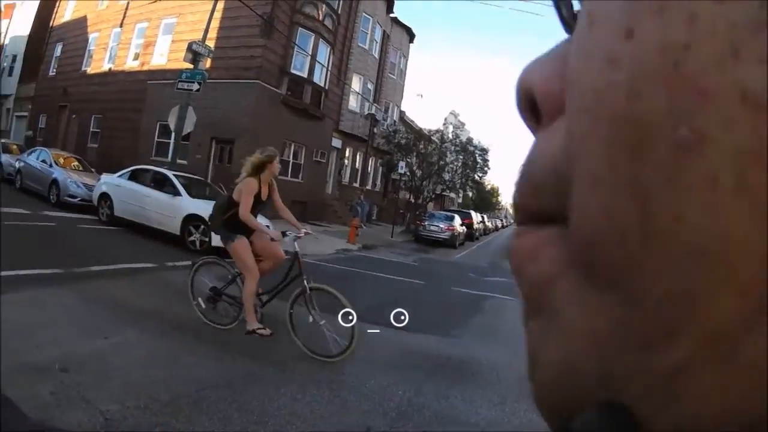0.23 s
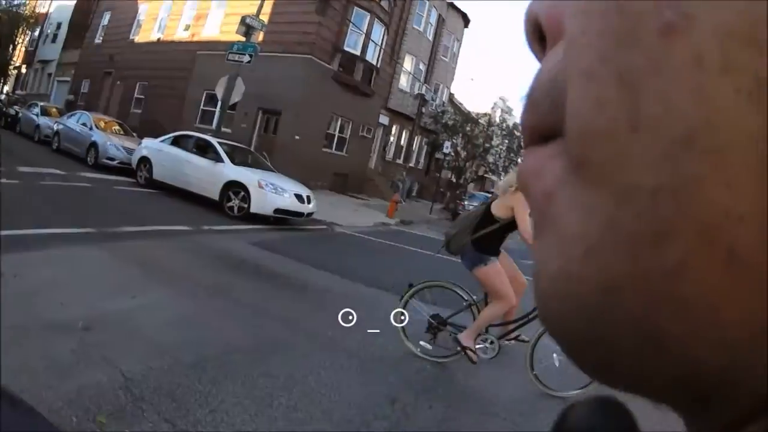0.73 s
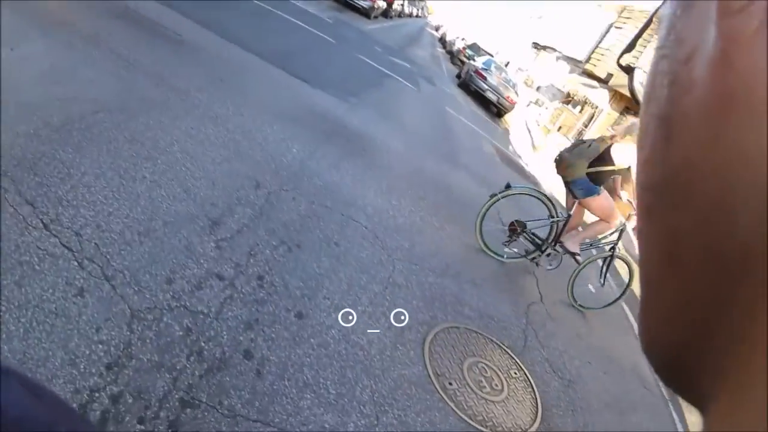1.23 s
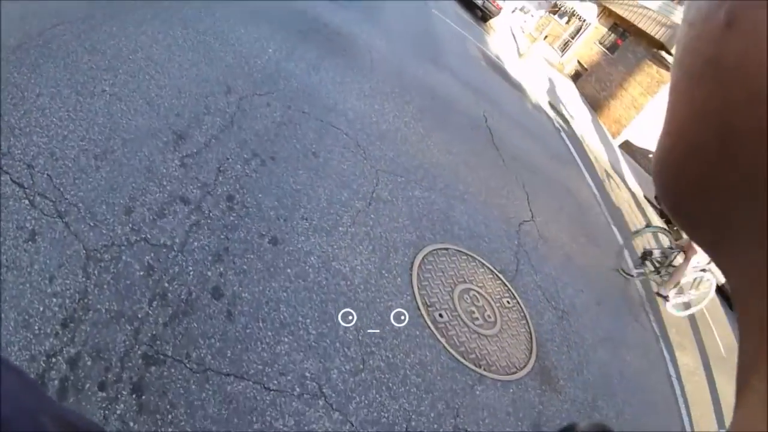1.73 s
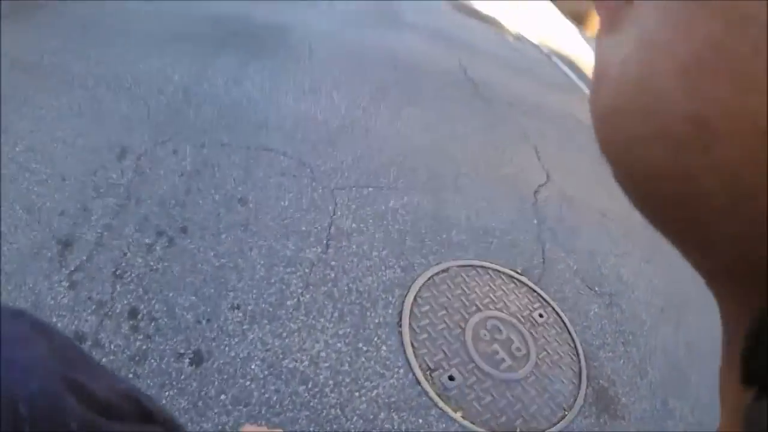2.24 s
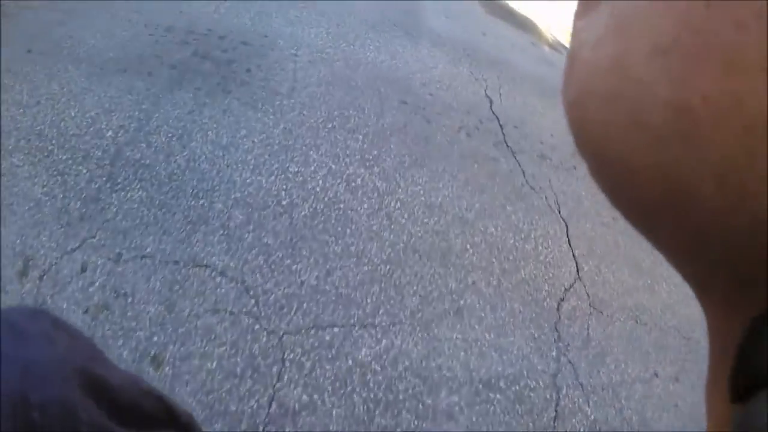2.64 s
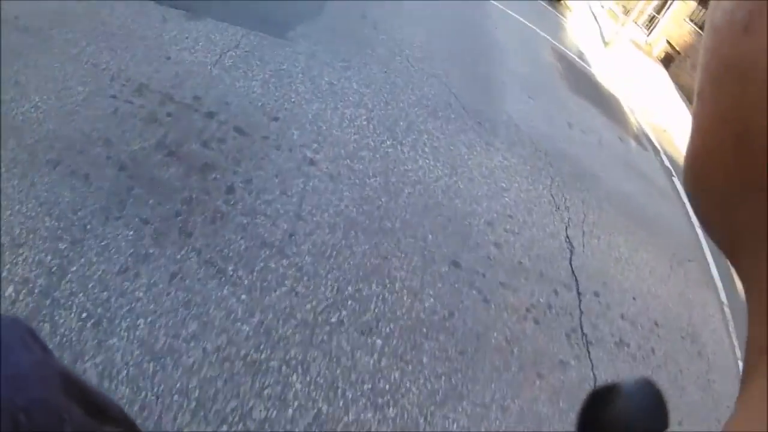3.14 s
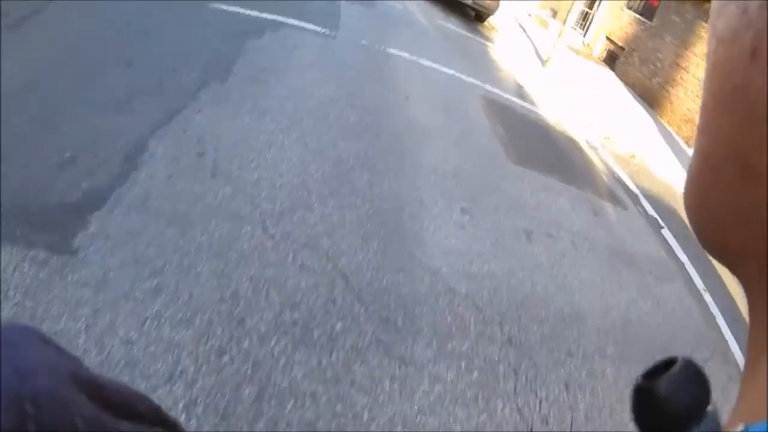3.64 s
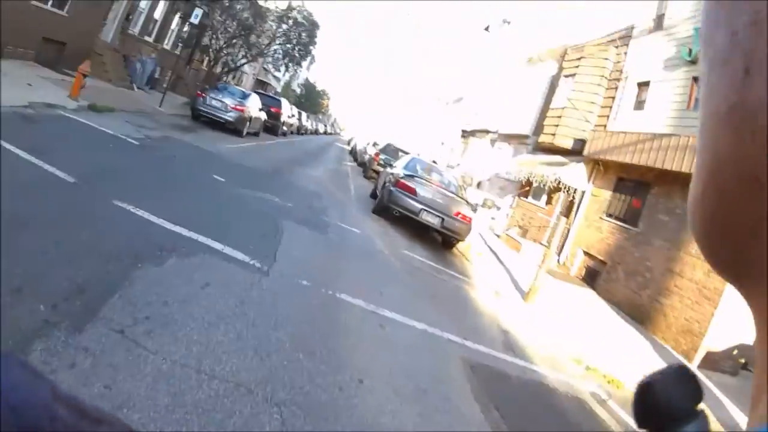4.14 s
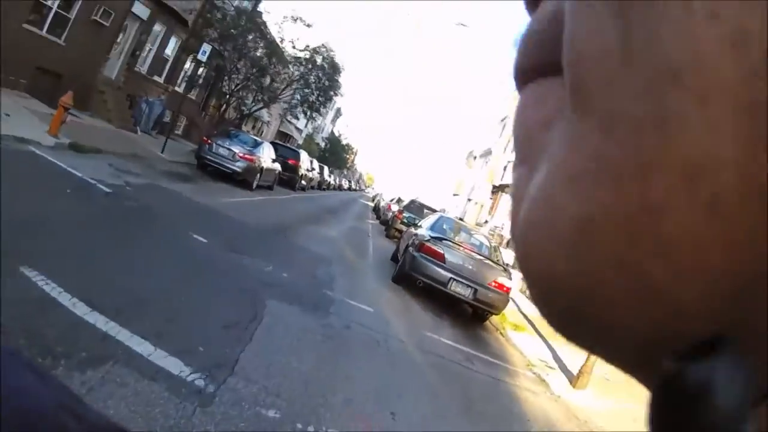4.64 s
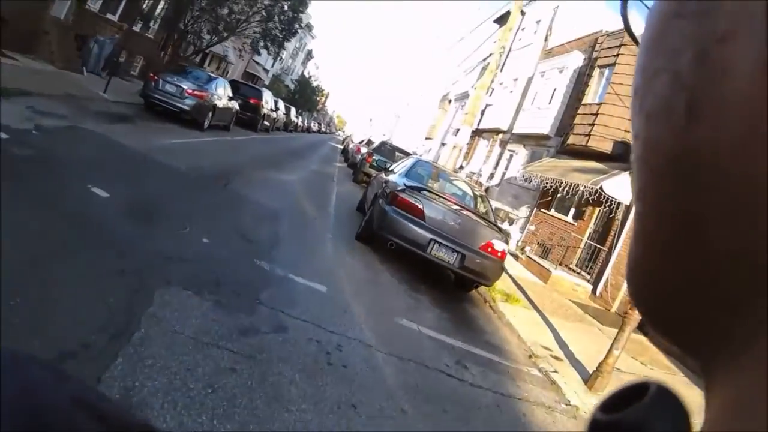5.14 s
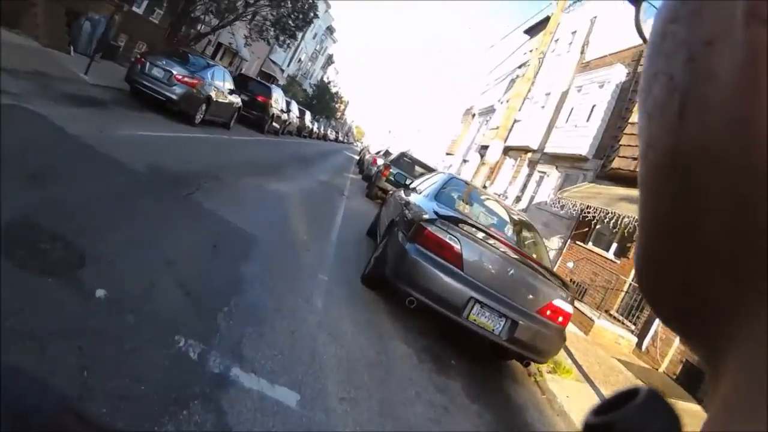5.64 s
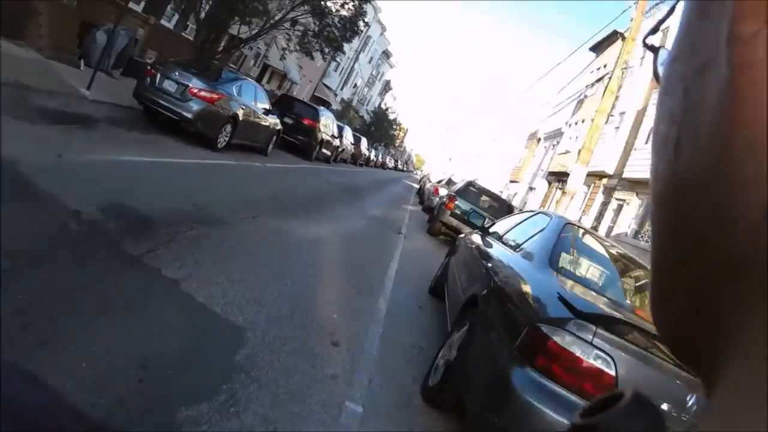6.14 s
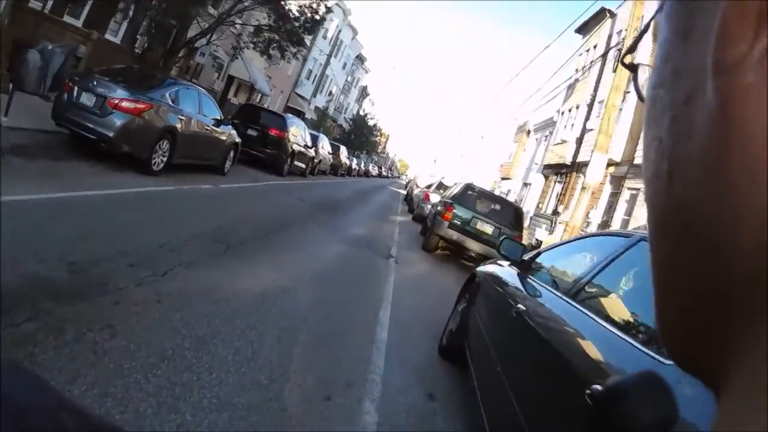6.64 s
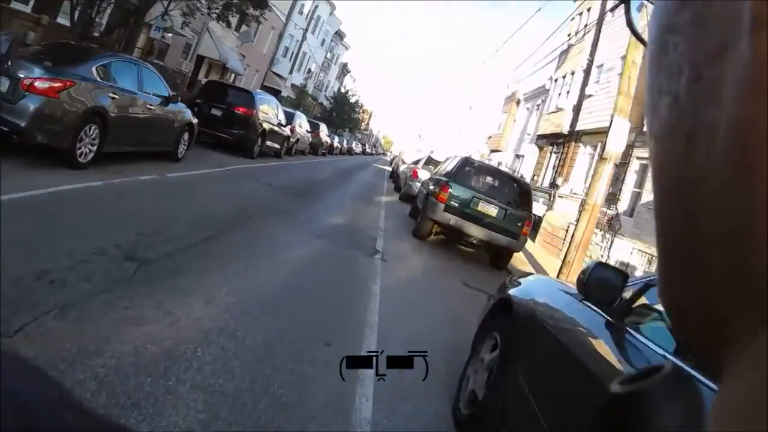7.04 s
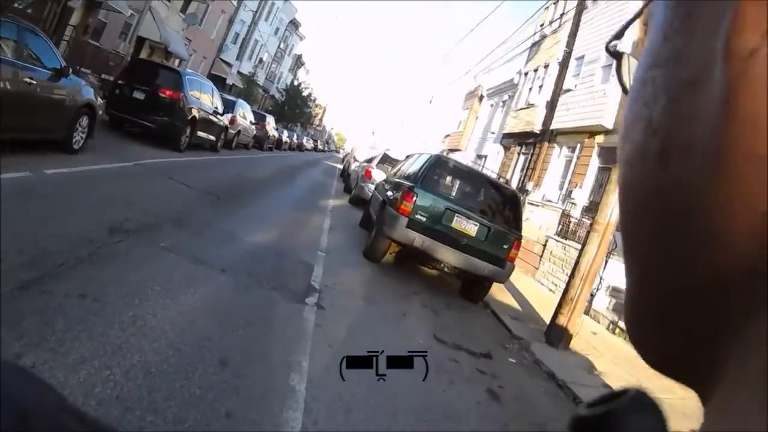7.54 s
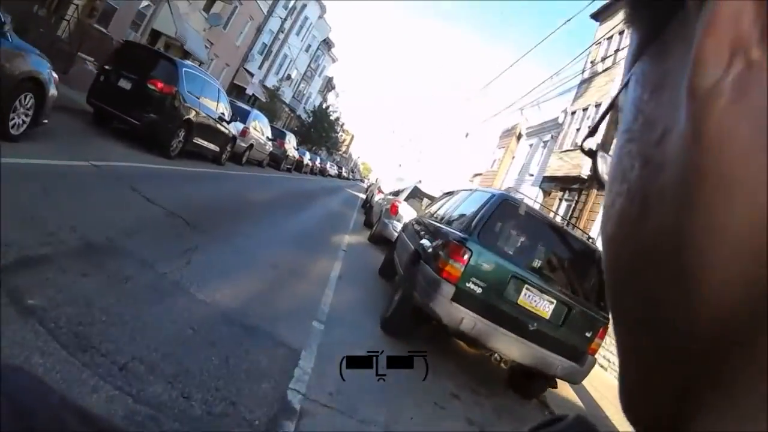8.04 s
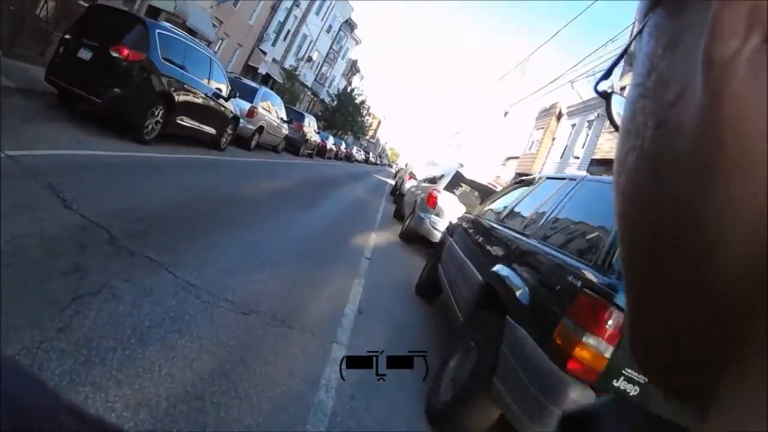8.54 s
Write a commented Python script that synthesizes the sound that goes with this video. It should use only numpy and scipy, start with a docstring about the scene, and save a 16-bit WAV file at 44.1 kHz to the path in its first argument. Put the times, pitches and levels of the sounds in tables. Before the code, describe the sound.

For the first two seconds there is low, soft city traffic and faint air, with short raspy sparrow chirps at 0 to 0.7 and again near 1.5, lightly echoed by houses. Knocks and ticks on the bicycle come at 1.4, 1.6 and 1.8, with a tiny squeak at 1.9 and a dull thud at 2.2. At about 2.26 a small two-stroke engine catches abruptly, close to the microphone, puttering slowly with crackle, hiss and loose metal rattles. Around 3.3 it surges and pulls away, smoother and boomier, its buzz rising unevenly towards 5.9. From 5.9 to 6.7 it misfires in uneven, hollow low thumps, with blunt wind puffs. It then recovers into a steady, fast, raspy drone with thin metallic ringing, shifting slightly in colour beside parked cars and climbing in pitch to the end at 8.8.

```python
"""Motorized bicycle pulling away

Traffic hums and sparrows chirp; something on the bike knocks before its two-stroke engine catches.
It putters at idle, then speeds up: every firing rings pipe models and sets off bursts and rings of metal and gas.
It misfires for a moment with dull thumps; wandering delays then echo it off parked cars.
Coloured noise makes the traffic and the wind, which grows with engine speed.
"""
import sys
import numpy as np
from scipy import signal
from scipy.fft import rfft, irfft, next_fast_len
from scipy.io import wavfile
from scipy.ndimage import uniform_filter1d, map_coordinates

SR = 44100
rng = np.random.default_rng(int(sys.argv[2]) if len(sys.argv) > 2 else 0)


def waveform_to_disk(signal):
    """Save audio, clipped to [-1, 1], as 16-bit WAV at the path in sys.argv[1]."""
    frames = np.transpose(np.atleast_2d(signal))
    scaled = np.clip(frames, -1, 1) * 32767
    samples = np.round(scaled).astype(np.int16)
    wavfile.write(sys.argv[1], SR, samples)


N = 387638

# street traffic spectrum: freq_hz, relative_db
STREET_SPECTRUM = [(25, -11.5), (60, -7.5), (130, -3), (230, -1), (400, -5), (700, -8), (1100, -12),
                   (1700, -20), (3000, -32), (5000, -39), (7500, -48.5)]
# steady wind spectrum: freq_hz, relative_db
BUFFET_SPECTRUM = [(20, -30), (60, -11), (130, -19.5), (220, -16.5), (320, -15), (500, -6.5), (1200, -21.5),
                   (4000, -64.5)]
# gust spectrum: freq_hz, relative_db
GUST_SPECTRUM = [(20, -24), (60, -8), (120, -3), (190, -2), (300, -14), (600, -25), (1200, -40),
                 (4000, -75)]
# gusts on the microphone: centre_s, half_length_s, level_db
GUSTS = [(5.2, 0.36, -29), (5.948, 0.026, -16), (6.3, 0.38, -34), (6.74, 0.037, -16.5), (7.05, 0.068, -24),
         (7.47, 0.056, -27.5)]
WIND_STILL_DB, WIND_RIDING_DB = -46.5, -39.5  # at idle, under load

# sparrow notes: start_s, length_s, start_hz, middle_hz, end_hz, level_db
CHIRPS = [(-.01, 0.056, 4300, 3840, 2840, -42), (0.224, 0.038, 4060, 3920, 3870, -47),
          (0.28, 0.057, 3280, 3170, 3170, -45), (0.555, 0.017, 5300, 4500, 4000, -51),
          (0.61, 0.058, 4350, 5000, 5400, -44), (0.652, 0.049, 4300, 3990, 4720, -44),
          (0.697, 0.031, 3300, 3670, 4650, -39.5), (1.436, 0.039, 5100, 4980, 4600, -48),
          (1.46, 0.041, 4120, 3780, 3380, -45), (1.526, 0.032, 3400, 2960, 2700, -43)]

# blows and ticks on the bike: start_s, relative_db, brightness (0-1), decay_s
KNOCKS = [(1.417, -27.5, 0.58, 0.017), (1.612, -35.5, 0.8, 0.014), (1.826, -39, 1, 0.005),
          (2.176, -30, 0.9, 0.0046), (2.201, -19.5, 0.07, 0.027)]
# dull part of a blow: freq_hz, relative_db
THUD_SPECTRUM = [(30, -34), (120, -5.5), (230, -1), (450, -16), (800, -21), (1500, -50), (8000, -65)]
# bright part of a blow: freq_hz, relative_db
CLACK_SPECTRUM = [(30, -27), (150, 3), (500, -5), (800, -4), (1100, 2), (1400, -4), (1800, -11),
                  (3000, -17), (8000, -38)]
# loose metal rattles: centre_s, half_length_s, level_db
RATTLES = [(2.294, 0.0016, -22.5), (2.414, 0.0018, -23), (2.476, 0.0025, -25), (2.882, 0.0037, -27.5),
           (2.9, 0.016, -28), (3.33, 0.05, -54)]
# frame hum at the firing rate: time_s, level_db
SHAKE_LEVEL = [(5.3, -65), (5.8, -42), (6.1, -56), (7.3, -50), (7.9, -42), (8.7, -40.5)]

FIRST_FIRING_S = 2.2621
# engine speed: time_s, firing_rate_hz
SPEED = [(2.26, 34.9), (2.56, 28.63), (2.94, 30.23), (3.13, 33.99), (3.35, 44.81), (3.6, 40.2),
         (3.89, 40.49), (3.98, 44.83), (4.18, 47.71), (4.43, 41.74), (4.65, 44.34), (5.36, 49.13),
         (5.9, 59.21), (6.05, 55.08), (6.3, 56.37), (6.6, 53.51), (7.13, 56.44), (7.45, 55.62),
         (7.81, 58.7), (8.54, 58.71), (8.79, 63.12)]
IDLE_HZ, BITE_HZ, LOADED_HZ = 35.2, 37, 46  # firing rates: idle, drive bites, full load
WAVER_S, WAVER_RATE_HZ = 0.00011, 14  # crank drift ahead and behind
ROUGH_IDLE, ROUGH_LOADED, ROUGH_SKIPPING = 0.3, 0.2, 0.17  # roughness; the last is added while skipping
# engine skips at part throttle: from_s, to_s, ramp_s
SKIPPING = (5.92, 6.7, 0.18)
# drive takes up its slack, metal quietens: from_s, to_s, ramp_s
PULL_AWAY = (3.29, 4.92, 0.46)

# exhaust pipe, throttle closed: freq_hz, relative_db
PIPE_IDLE = [(30, -32.5), (130, 0), (205, -2.5), (290, 6), (440, -7), (520, -7.5), (680, -5), (930, -8),
             (1130, -19), (1240, -30), (1430, -11), (1620, -25.5), (1850, -53), (8000, -82)]
# exhaust pipe, throttle open: freq_hz, relative_db
PIPE_LOAD = [(30, -33.5), (115, 0.5), (180, 7), (250, -5.5), (340, 7.5), (420, -11), (510, -2), (660, -4),
             (810, 2.5), (960, -7), (1090, -8.5), (1270, -18), (1470, -21.5), (1750, -30), (8000, -100)]
# pipe resonances raised by hotter gas: time_s, pitch_scale
PIPE_HEAT = [(2.3, 0.89), (2.7, 0.86), (3.35, 0.95), (3.8, 0.99), (5.1, 0.93), (5.9, 0.95), (7.3, 0.95),
             (8.0, 1)]
# how hard the engine fires: time_s, pop_db, boom_db
EFFORT = [(2.26, -14.5, -16.5), (2.6, -17.5, -17), (3.1, -16.5, -18.5), (3.32, -10.5, -16), (3.6, -18, -21),
          (4.15, -17, -23), (4.45, -21.5, -23), (4.66, -16, -18), (5.25, -16, -17), (5.42, -14, -16),
          (5.5, -16, -19), (5.78, -15.5, -18), (6.05, -19, -25), (6.3, -17, -22.5), (6.64, -20.5, -21.5),
          (6.75, -16.5, -17.5), (6.92, -17.5, -21), (7.85, -17.5, -19), (8.42, -16, -17.5), (8.6, -19, -19)]
# gas puff of a full firing, shorter is brighter: time_s, width_s
PUFF = [(3.1, 0.00016), (3.35, 0.00025), (3.7, 0.00029), (4.15, 0.00036), (4.6, 0.00023), (5.4, 0.0003),
        (5.8, 0.00026), (6.6, .00019), (6.85, 0.00014), (7.4, .00017), (7.6, 0.000078), (7.8, 0.00024),
        (7.95, 0.00018), (8.1, 0.00027), (8.7, 0.00023)]
# loaded boom follows the crank: reference firing rate, exponent, lowest pitch scale
BOOM_HZ, BOOM_FOLLOWS, BOOM_LOWEST = 57.4, 0.97, 0.865
# silencer chambers, throttle closed: centre_hz, width_hz
CHAMBERS_IDLE = [(174, 84), (1035, 215)]
# silencer chambers, throttle open: centre_hz, width_hz
CHAMBERS_LOAD = [(990, 370)]
# low midrange of the pops, before trim: time_s, relative_db
MIDRANGE_LEVEL = [(2.32, -26), (2.97, -25.5), (3.36, -20.5), (3.65, -29), (4.19, -20.5), (4.33, -27.5),
                  (5.63, -23), (5.84, -27.5), (6.53, -26.5), (6.8, -19), (6.87, -29), (7.11, -29.5),
                  (7.2, -18.5), (7.36, -27.5), (7.5, -22.5), (7.74, -26), (7.84, -17), (7.9, -30),
                  (7.93, -20), (8.02, -19.5), (8.11, -32), (8.17, -24.5), (8.47, -28), (8.51, -42),
                  (8.53, -26.5), (8.78, -25)]
MIDRANGE_HZ, MIDRANGE_WIDTH_HZ, MIDRANGE_TRIM_DB = 486, 182, 0.5

# weak firings and their thumps in the silencer: start_s, thump_db
MISFIRES = [(5.968, -12), (6.006, -11), (6.043, -15), (6.096, -9), (6.13, -8), (6.166, -10), (6.187, -17),
            (6.223, -9), (6.256, -8.5), (6.291, -8), (6.329, -15), (6.363, -8), (6.401, -11.5),
            (6.438, -22), (6.491, -16), (6.548, -16), (6.618, -13)]
SKIP_LOSS, SKIP_WIDENS = 0.38, 0.15  # shares: strength lost, puff width gained
THUMP_HZ, THUMP_RISE_S = 235, 0.0046

# engine case: centre_hz, width_hz, relative_db
CASE_MODES = [(1450, 170, 18.5), (1995, 310, 7), (2570, 260, -18)]
CLATTER_DB, CLATTER_IDLE_DB, CLATTER_PULL_DB = -22.5, -3, -27  # re pops; added at idle; while pulling away
# escaping gas: freq_hz, relative_db
HISS_SPECTRUM = [(500, -19.5), (1500, 20.5), (3200, 11), (4500, 8), (7400, 0), (9000, -88.5)]
HISS_DB, HISS_IDLE_DB, HISS_PULL_DB = -31, 6.5, -5.5  # likewise
RASP_BETWEEN, RASP_BETWEEN_IDLE = 0.47, -0.091  # share of rasp between firings; change at idle
# air box, applied twice: centre_hz, width_hz, relative_db
AIRBOX_MODES = [(425, 354, 0)]
INTAKE_DB, INTAKE_IDLE_DB = -18, 9  # re pops; added at idle
# exhaust port cracking open: freq_hz, relative_db
SNAP_SPECTRUM = [(800, -41.5), (2200, -12), (3500, -5), (5500, -1), (7400, 1), (9000, -61.5)]
SNAP_DB, SNAP_PULL_DB = -37.5, 0.5  # re pops; added while pulling away
# crackling spray: freq_hz, relative_db
SPRAY_SPECTRUM = [(600, -32.5), (1500, -2), (2300, 1.5), (3200, -4), (4200, -14.5), (7500, -20.5),
                  (9000, -60.5)]
# crackling spray: time_s, level_db
SPRAY_LEVEL = [(2.26, -47), (2.31, -45), (2.5, -36), (2.75, -46), (2.9, -40.5), (3.05, -44), (3.22, -42),
               (3.36, -34.5), (3.46, -51), (3.7, -72)]
# cooling fins: time_s, pitch_hz
FINS_PITCH = [(4.4, 2745), (5.5, 2734), (6.7, 2750), (7.1, 2800), (8.7, 2780)]
# cooling fins: time_s, level_db
FINS_LEVEL = [(3.65, -56), (3.8, -52), (4.2, -54), (4.5, -45.5), (4.7, -51), (4.95, -50), (5.1, -45.5),
              (5.5, -48), (5.9, -48), (6.05, -55), (6.25, -47.5), (6.62, -55.5), (6.73, -42.5), (6.87, -51),
              (7.1, -46), (7.65, -48.5), (8.2, -53), (8.4, -47), (8.78, -50.5)]
# engine head: time_s, pitch_hz
HEAD_PITCH = [(4.9, 2058), (5.8, 2131), (7.2, 2174), (8.7, 2152.5)]
# engine head: time_s, level_db
HEAD_LEVEL = [(3.6, -69.5), (4.5, -64), (5, -49), (5.4, -44), (5.9, -44), (6.05, -59), (6.3, -44),
              (6.7, -58), (7.15, -45.5), (7.5, -46.5), (7.8, -51), (8.7, -50.5)]
# cylinder rung by the piston: time_s, pitch_hz
CYLINDER_PITCH = [(2.3, 1276), (2.7, 1265), (3.6, 1330), (4.4, 1400), (5.402, 1398), (7.999, 1456)]
# cylinder, before trim: time_s, relative_db
CYLINDER_LEVEL = [(2.32, -28), (2.34, -26), (2.88, -23), (2.97, -27), (3.88, -30), (4.01, -42.5),
                  (4.71, -34.5), (4.73, -43), (5.32, -37.5), (6.1, -47), (6.83, -34), (7.39, -49),
                  (7.5, -33.5), (8.78, -36)]
FINS_RING_S, HEAD_RING_S, SLAP_RING_S, SLAP_TRIM_DB = 0.004, 0.0012, 0.0019, -2.5

# echoes off parked cars: from_s, to_s, ramp_s
PARKED_CARS = (6.2, 9.5, .5)
ECHO_PATHS_M, ECHO_WANDER_M, ECHO_RATE_HZ, ECHO_DB = (1.5, 2.4), .3, 4, -14  # extra path, its wander
SOUND_M_PER_S = 343
TOP_HZ = 7900


def amp(db):
    """Decibels to gain."""
    return 10 ** (np.asarray(db) / 20)


def unit(x):
    """Scale to rms 1."""
    return x / np.sqrt(np.mean(x ** 2) + 1e-20)


def along(points, hz):
    """Interpolate (freq_hz, value) points on a log axis."""
    f, v = np.transpose(points)
    return np.interp(np.log(hz + 1), np.log(f + 1), v)


def curves(rows):
    """One value per sample for each column after the time."""
    s, *cols = np.transpose(rows)
    return [np.interp(np.arange(N) / SR, s, c) for c in cols]


def wobble(rate_hz):
    """Smooth random curve with rate_hz knots a second."""
    knots = rng.standard_normal(int(N * rate_hz / SR) + 4)
    return map_coordinates(knots, [np.arange(N) * rate_hz / SR])


def spell(start_s, end_s, ramp_s):
    """Rise from 0 to 1, hold and fall back."""
    t = np.arange(N) / SR
    return np.clip(np.minimum(t - start_s, end_s - t) / ramp_s, 0, 1)


def swells(rows):
    """Summed gain of bell-shaped swells: centre_s, half_length_s, level_db."""
    t = np.arange(N) / SR
    return sum(amp(db) * np.exp(-((t - s) / length) ** 2) for s, length, db in rows)


def filtered(x, response):
    """Multiply the spectrum of x by a response of frequency."""
    m = next_fast_len(N + SR // 2)
    return irfft(rfft(x, m) * response(np.fft.rfftfreq(m, 1 / SR)), m)[:N]


def coloured(x, spectrum):
    """Filter x by a spectrum table."""
    return filtered(x, lambda hz: amp(along(spectrum, hz)))


def noise(spectrum):
    """Coloured noise of rms 1."""
    return unit(coloured(rng.standard_normal(N), spectrum))


def resonate(x, modes):
    """Pass x through parallel band-pass resonances."""
    def response(f):
        return sum(amp(db) * 1j * f * w / (c * c - f * f + 1j * f * w) for c, w, db in modes)
    return filtered(x, response)


def impulse(spectrum, size=4096):
    """Minimum-phase ring of a body with this spectrum."""
    cepstrum = irfft(np.log(amp(along(spectrum, np.fft.rfftfreq(size, 1 / SR)))))
    # fold onto positive time to make the ring causal
    cepstrum[1:size // 2] *= 2
    cepstrum[size // 2 + 1:] = 0
    return irfft(np.exp(rfft(cepstrum)))[:size // 2]


def levelled(x, at):
    """Bring a pulse train to rms 1, averaged over five cycles."""
    power = np.add.reduceat(x ** 2, at) / np.diff(np.append(at, N))
    smooth = uniform_filter1d(power[:-1], size=5)
    return x / np.sqrt(np.interp(np.arange(N), at[:-1], smooth) + 1e-20)


def speeding(from_hz, to_hz):
    """0 to 1 as the firing rate climbs through a range."""
    return np.clip((curves(SPEED)[0] - from_hz) / (to_hz - from_hz), 0, 1)


def air(traffic_db=-34.0, lumps_db=-2.0):
    """Steady traffic noise, lumpy wind that grows with engine speed, and gusts."""
    traffic = amp(traffic_db) * noise(STREET_SPECTRUM)
    riding = speeding(IDLE_HZ, LOADED_HZ)
    breeze = amp(WIND_STILL_DB + (WIND_RIDING_DB - WIND_STILL_DB) * riding)
    lumps = unit(amp(lumps_db * wobble(22)) * noise(BUFFET_SPECTRUM))
    return traffic + breeze * lumps + swells(GUSTS) * noise(GUST_SPECTRUM)


def sparrows(rasp=0.057, echo_db=-2, t60_s=0.37):
    """Short glides with a raspy pitch, echoed by the house fronts as a decaying noise tail."""
    song, waver = np.zeros(N), 1 + rasp * wobble(600)
    for s, length, start_hz, middle_hz, end_hz, db in CHIRPS:
        i = np.arange(max(int(s * SR), 0), int((s + length) * SR))
        u = np.clip((i / SR - s) / length, 0, 1)
        pitch_hz = np.interp(u, [0, .5, 1], [start_hz, middle_hz, end_hz]) * waver[i]
        envelope = np.sqrt(np.abs(np.sin(np.pi * u)))
        song[i] += amp(db) * envelope * np.sin(2 * np.pi * np.cumsum(pitch_hz) / SR)
    t = np.arange(SR // 2) / SR
    tail = rng.standard_normal(len(t)) * np.exp(-np.log(1000) * t / t60_s)
    return song + amp(echo_db) * signal.fftconvolve(song, tail / np.linalg.norm(tail))[:N]


def squeak(pitch_hz=4000, waver=.003):
    """Faint thin sine squeak just before the engine catches."""
    phase = 2 * np.pi * np.cumsum(pitch_hz * (1 + waver * wobble(60))) / SR
    return swells([(1.91, 0.083, -59)]) * np.sin(phase)


def knocks(rise_s=0.0015, trim_db=7.5):
    """Decaying dull and bright noise: blows and small ticks on the bike before the engine catches."""
    thud, clack, out = noise(THUD_SPECTRUM), noise(CLACK_SPECTRUM), np.zeros(N)
    for s, db, bright, decay_s in KNOCKS:
        t = np.maximum(np.arange(N) / SR - s, 0)
        envelope = (1 - np.exp(-t / rise_s)) * np.exp(-t / decay_s)
        out += amp(db + trim_db) * envelope * ((1 - bright) * thud + bright * clack)
    return out


def rattles(chatter=0.15):
    """Short chattering noise bursts coloured by the engine case."""
    grains = rng.standard_normal(N) * np.exp(chatter * wobble(700))
    return swells(RATTLES) * unit(resonate(grains, CASE_MODES))


def shake():
    """Unbalanced crank hums the frame: a sine at the firing rate."""
    turns = np.cumsum(curves(SPEED)[0] * (np.arange(N) / SR > FIRST_FIRING_S)) / SR
    return amp(curves(SHAKE_LEVEL)[0]) * np.sqrt(2) * np.sin(2 * np.pi * turns)


def firings(rough, jitter_s=0.00044):
    """Sample of each firing: one per crank turn, jittered in proportion to roughness."""
    start = int(FIRST_FIRING_S * SR)
    turns = np.cumsum(curves(SPEED)[0][start:]) / SR
    at = start + np.searchsorted(turns, np.arange(int(turns[-1]) + 1))
    jitter = jitter_s * rough[at] * rng.standard_normal(len(at))
    late_s = jitter + WAVER_S * wobble(WAVER_RATE_HZ)[at]
    return np.clip(at + (SR * late_s).astype(int), 0, N - 1)


def taps(at, scatter_db):
    """One single-sample blow of random strength at each firing."""
    kicks = np.zeros(N)
    kicks[at] = amp(scatter_db * rng.standard_normal(len(at)))
    return kicks


def bursts(at, delay_s, decay_s, between, scatter_db):
    """Noise that flares after each firing and sinks to a steady share between them."""
    t = np.arange(SR // 20) / SR - delay_s
    decay = (t > 0) * np.exp(-np.abs(t) / decay_s)
    flare = signal.fftconvolve(taps(at, scatter_db), decay)[:N]
    return (flare + between * (np.arange(N) >= at[0])) * rng.standard_normal(N)


def ringing(at, pitch, ring_s, detune, scatter_db):
    """A metal part swells and dies away after each firing, at a slightly random pitch."""
    t, hz, out = np.arange(SR // 30) / SR, curves(pitch)[0], np.zeros(N + SR)
    envelope = t * np.exp(-t / ring_s)
    for i, (off, size) in zip(at, rng.standard_normal((len(at), 2))):
        tone = np.sin(2 * np.pi * hz[i] * (1 + detune * off) * t)
        out[i:i + len(t)] += amp(scatter_db * size) * envelope * tone
    return levelled(out[:N], at)


def intake(at):
    """The piston sucks air through the air box well after each pop: delayed resonant bursts."""
    gulps = bursts(at, delay_s=0.013, decay_s=0.003, between=0.38, scatter_db=3.0)
    return levelled(resonate(resonate(gulps, AIRBOX_MODES), AIRBOX_MODES), at)


def snaps(at):
    """Short bright noise crack as the exhaust port opens."""
    crack = bursts(at, delay_s=.0006, decay_s=.0011, between=0, scatter_db=2.5)
    return levelled(coloured(crack, SNAP_SPECTRUM), at)


def spray(at, grain=0.45):
    """Unburnt mixture crackles behind the slow pops: grainy noise bursts."""
    grains = bursts(at, delay_s=.0008, decay_s=.003, between=.1, scatter_db=1.5)
    grains = grains * np.exp(grain * wobble(900))
    return amp(curves(SPRAY_LEVEL)[0]) * levelled(coloured(grains, SPRAY_SPECTRUM), at)


def clatter(at, between, idle):
    """Noise bursts ring the engine case, grainier at idle."""
    blows = bursts(at, delay_s=.001, decay_s=.003, between=between, scatter_db=1.8)
    return levelled(resonate(blows * np.exp(.5 * idle * wobble(500)), CASE_MODES), at)


def hiss(at, between):
    """Escaping gas: a bright noise burst after each firing."""
    jet = bursts(at, delay_s=.0008, decay_s=.0028, between=between, scatter_db=2.2)
    return levelled(coloured(jet, HISS_SPECTRUM), at)


def exhaust(at, load, scale, rough, width_s, split_hz=420, scatter_db=2):
    """Each firing rings the pipe: hot gas raises the pop, crank speed the loaded boom; turbulence varies each."""
    idle, loaded = impulse(PIPE_IDLE), impulse(PIPE_LOAD)
    n = np.arange(len(idle))
    crank = np.maximum((curves(SPEED)[0] / BOOM_HZ) ** BOOM_FOLLOWS, BOOM_LOWEST)
    trains = np.zeros((2, N + len(n)))  # pop, boom

    def stretched(ring, by):
        return np.interp(n * by, n, ring, right=0)

    def low(hz):
        return 1 / (1 + (hz / split_hz) ** 6)

    # a misfired charge burns weakly
    weak = np.zeros(len(at))
    weak[[np.argmin(np.abs(at / SR - s)) for s, _ in MISFIRES]] = 1
    strength = amp(scatter_db * rough[at] * rng.standard_normal(len(at))) * (1 - SKIP_LOSS * weak)
    widths_s = width_s[at] * (1 + SKIP_WIDENS * weak)
    for i, size, width in zip(at, strength, widths_s):
        eddies = .06 * rough[i] * rng.standard_normal(len(n)) * np.exp(-n / SR / .012)
        puff = np.exp(-.5 * ((n / SR - .0005) / width) ** 2)
        gas = signal.fftconvolve((n == 0) + eddies, puff / puff.sum())[:len(n)]
        for train, by in zip(trains, (scale[i], crank[i])):
            ring = (1 - load[i]) * stretched(idle, scale[i]) + load[i] * stretched(loaded, by)
            train[i:i + len(n)] -= size * signal.fftconvolve(gas, ring)[:len(n)]
    pop = filtered(trains[0, :N], lambda hz: 1 - low(hz))
    boom = filtered(trains[1, :N], low)
    pop_db, boom_db = curves(EFFORT)
    return amp(boom_db) * levelled(boom, at) + amp(pop_db) * levelled(pop, at)


def silencer(x, chambers):
    """All-pass chambers: each holds back its part of a pop for a moment."""
    def pole(f):
        return np.prod([(c * c - f * f + 1j * f * w) for c, w in chambers], axis=0)
    return filtered(x, lambda hz: np.conj(pole(hz)) / pole(hz))


def midrange(pops, at):
    """The low midrange of the pops swells and fades as the bike moves along the street."""
    band = filtered(pops, lambda hz: 1 / (1 + (2 * (hz - MIDRANGE_HZ) / MIDRANGE_WIDTH_HZ) ** 6))
    gain = amp(curves(MIDRANGE_LEVEL)[0] + MIDRANGE_TRIM_DB)
    return pops - band + gain * levelled(band, at)


def burble(detune=0.082):
    """The charge of each misfire flares late: a swelling low sine thump in the silencer."""
    out, t = np.zeros(N), np.arange(SR // 25) / SR
    swell = t / THUMP_RISE_S * np.exp(1 - t / THUMP_RISE_S)
    for (s, db), off in zip(MISFIRES, rng.standard_normal(len(MISFIRES))):
        tone = np.sin(2 * np.pi * THUMP_HZ * (1 + detune * off) * t)
        out[int(s * SR):][:len(t)] -= amp(db) * swell * tone
    return out


def engine(flutter_db=1.96):
    """Firings drive exhaust pops, intake, case clatter, gas hiss, spray, port snaps and metal rings."""
    pop_db, scale = curves(EFFORT)[0], curves(PIPE_HEAT)[0]
    idle, load = 1 - speeding(IDLE_HZ, LOADED_HZ), speeding(BITE_HZ, LOADED_HZ)
    pulling = spell(*PULL_AWAY)
    rough = ROUGH_IDLE + (ROUGH_LOADED - ROUGH_IDLE) * (1 - idle) + ROUGH_SKIPPING * spell(*SKIPPING)
    at = firings(rough)

    pipe = exhaust(at, load, scale, rough, curves(PUFF)[0])
    pops = silencer((1 - load) * pipe, CHAMBERS_IDLE) + silencer(load * pipe, CHAMBERS_LOAD)
    suction = amp(pop_db + INTAKE_DB + INTAKE_IDLE_DB * idle) * intake(at)

    between = RASP_BETWEEN + RASP_BETWEEN_IDLE * idle
    clatter_db = pop_db + CLATTER_DB + CLATTER_IDLE_DB * idle + CLATTER_PULL_DB * pulling
    hiss_db = pop_db + HISS_DB + HISS_IDLE_DB * idle + HISS_PULL_DB * pulling
    rasp = amp(clatter_db) * clatter(at, between, idle) + amp(hiss_db) * hiss(at, between)
    rasp = amp(flutter_db * wobble(23)) * rasp

    fins = ringing(at, FINS_PITCH, FINS_RING_S, detune=0.008, scatter_db=3)
    head = ringing(at, HEAD_PITCH, HEAD_RING_S, detune=0.014, scatter_db=3.5)
    slap = ringing(at, CYLINDER_PITCH, SLAP_RING_S, detune=0.024, scatter_db=1.8)
    ring = amp(curves(FINS_LEVEL)[0]) * fins + amp(curves(HEAD_LEVEL)[0]) * head
    ring += amp(curves(CYLINDER_LEVEL)[0] + SLAP_TRIM_DB) * slap

    snap = amp(pop_db + SNAP_DB + SNAP_PULL_DB * pulling) * snaps(at)
    return midrange(pops, at) + suction + rasp + spray(at) + ring + snap


def parked_cars(x):
    """Echoes off parked cars: randomly wandering delays shift the colour of the pops."""
    n, echoes = np.arange(N), np.zeros(N)
    for path_m in ECHO_PATHS_M:
        delay_s = (path_m + ECHO_WANDER_M * wobble(ECHO_RATE_HZ)) / SOUND_M_PER_S
        echoes += np.interp(n - SR * delay_s, n, x)
    return x + amp(ECHO_DB) * spell(*PARKED_CARS) * echoes


def scene():
    """The street and the bike; only the main engine sound is echoed by the cars."""
    street = air() + sparrows()
    bike = squeak() + knocks() + rattles() + shake() + burble()
    return (street + bike + parked_cars(engine()))[None]


def record(dry, top=1.0):
    """Round off the highest peaks, then cut steeply above TOP_HZ."""
    rounded = dry[0] / (1 + np.abs(dry[0] / top) ** 8) ** (1 / 8)
    return filtered(rounded, lambda hz: 1 / np.sqrt(1 + (hz / TOP_HZ) ** 90))[None]


dry = scene()
out = record(dry)
waveform_to_disk(out)
```